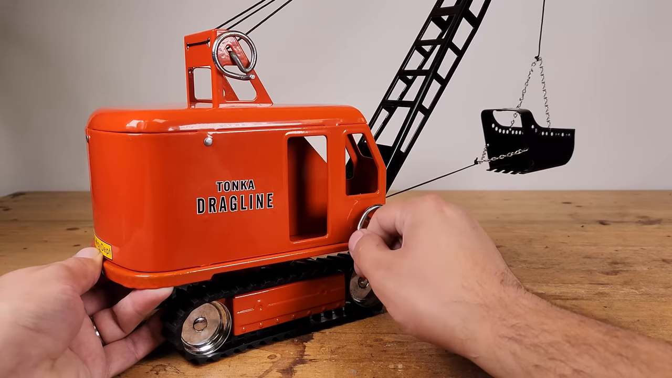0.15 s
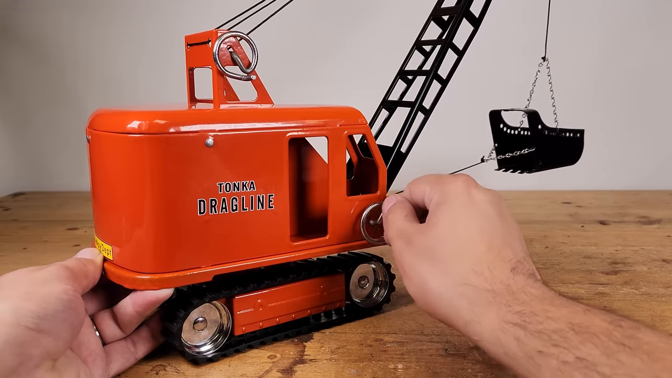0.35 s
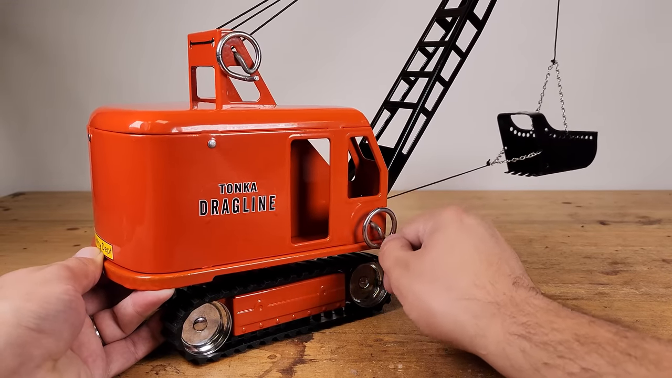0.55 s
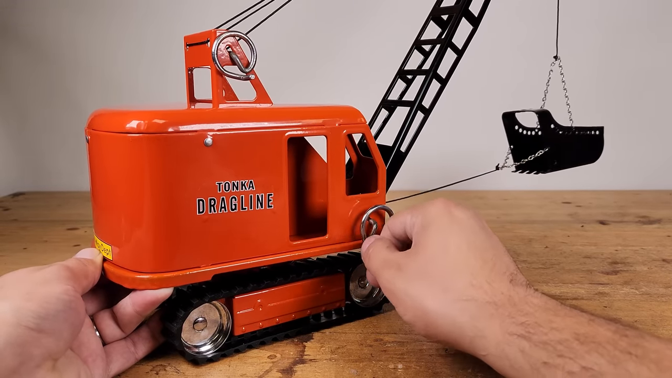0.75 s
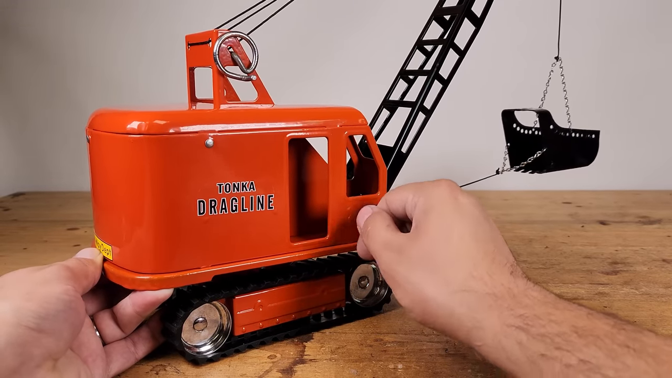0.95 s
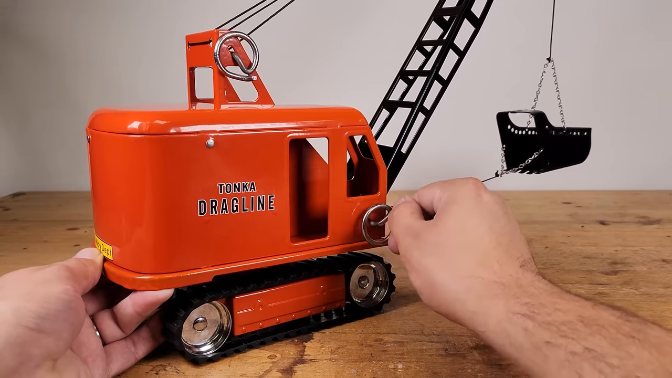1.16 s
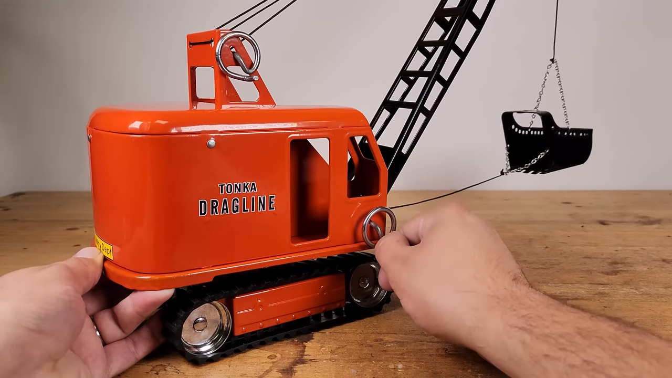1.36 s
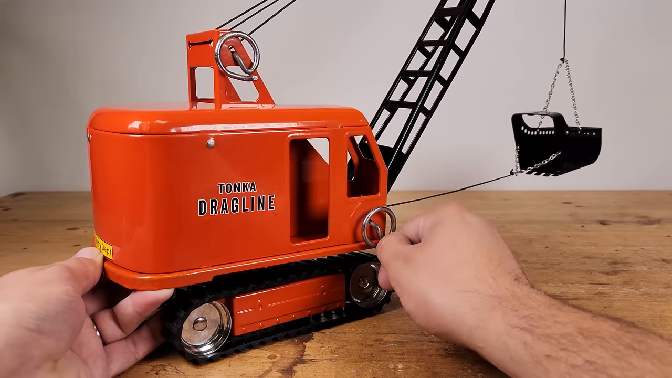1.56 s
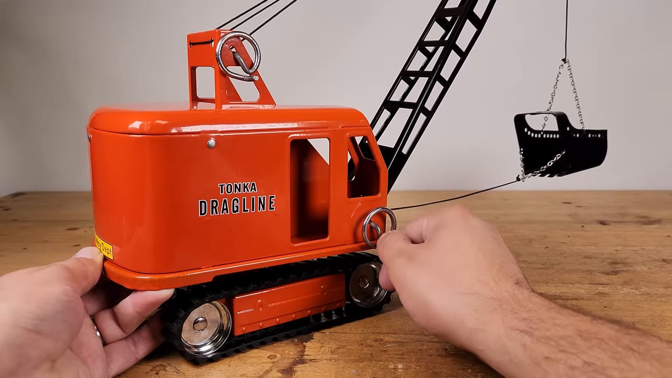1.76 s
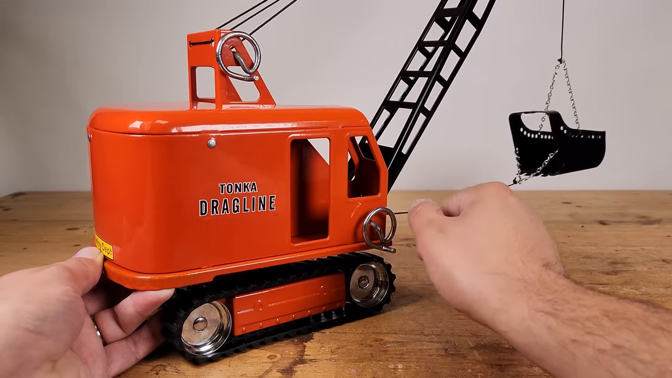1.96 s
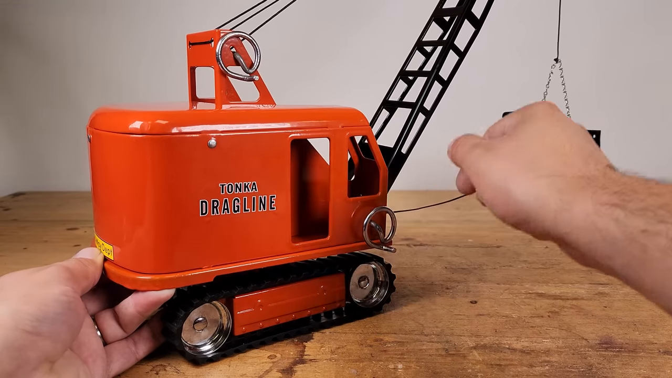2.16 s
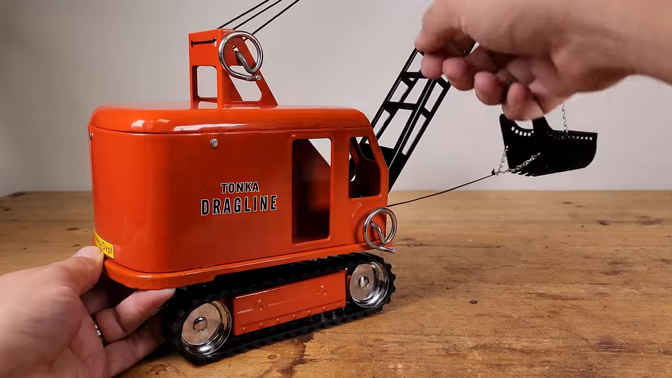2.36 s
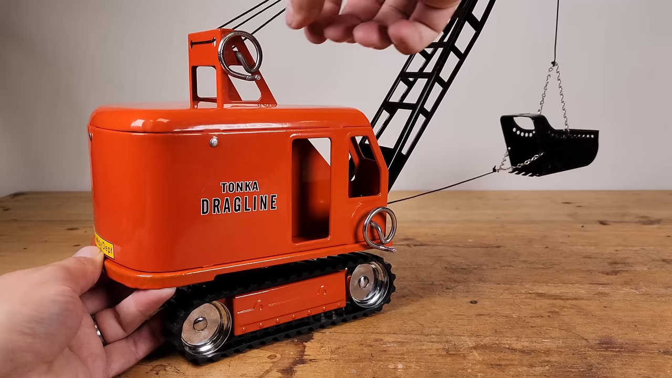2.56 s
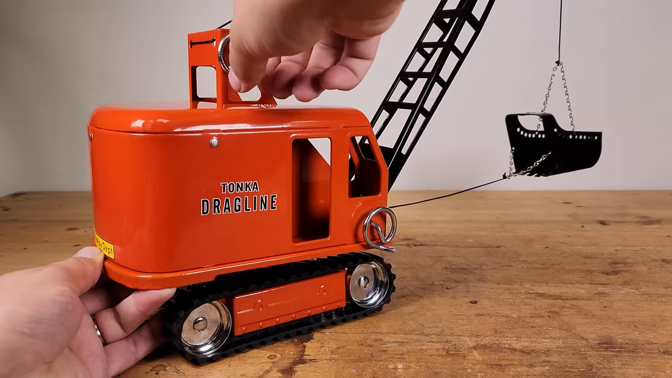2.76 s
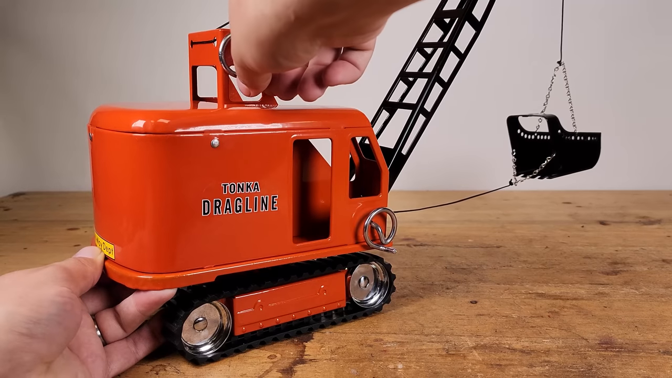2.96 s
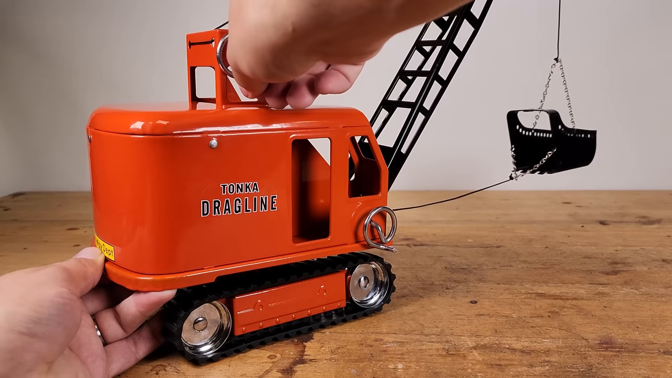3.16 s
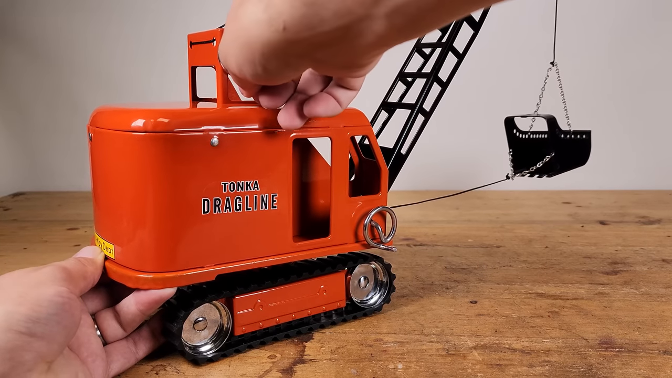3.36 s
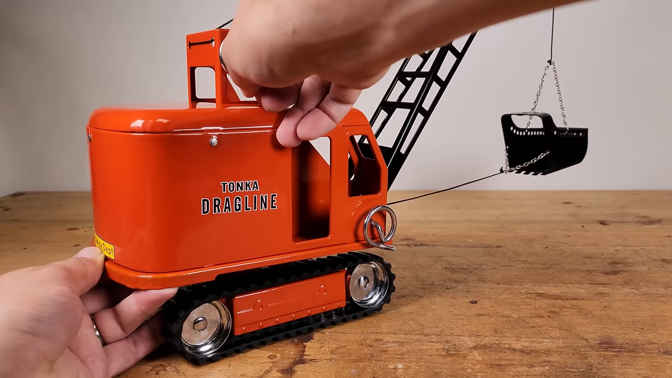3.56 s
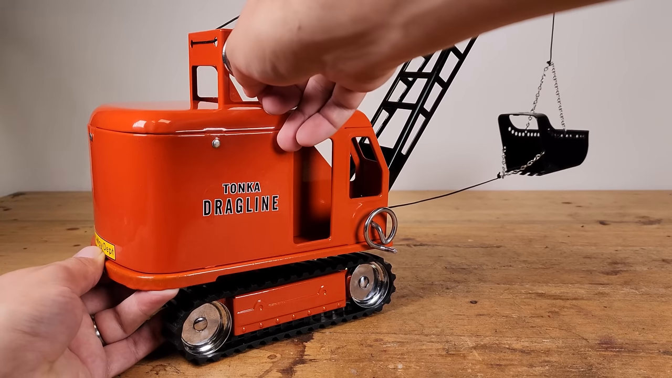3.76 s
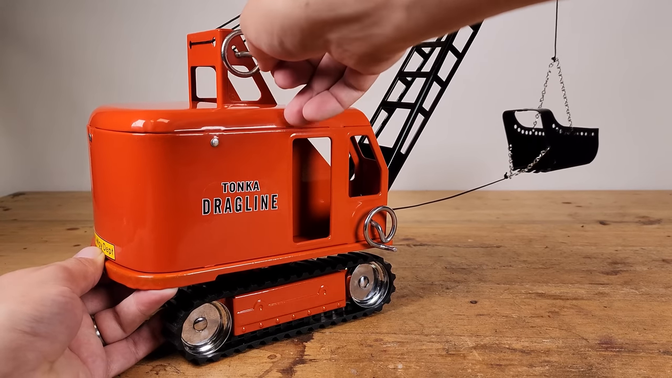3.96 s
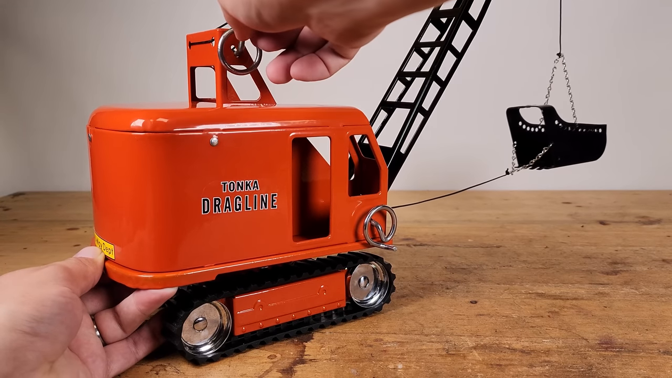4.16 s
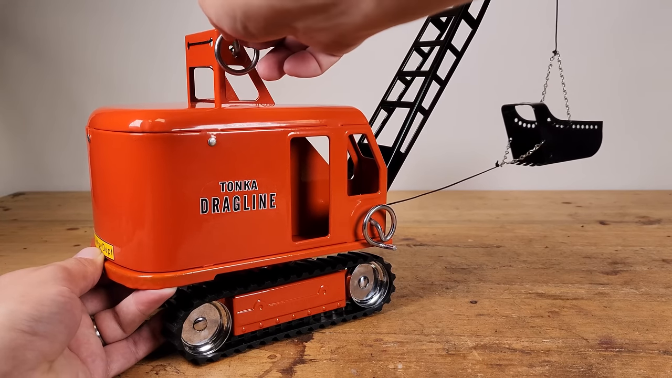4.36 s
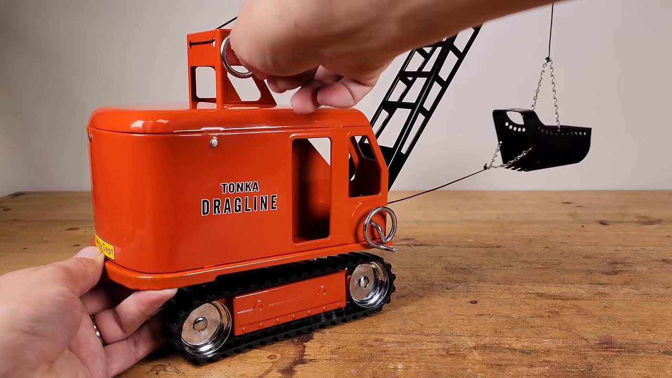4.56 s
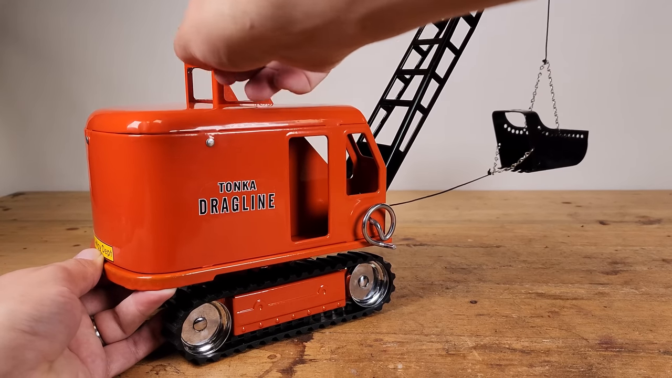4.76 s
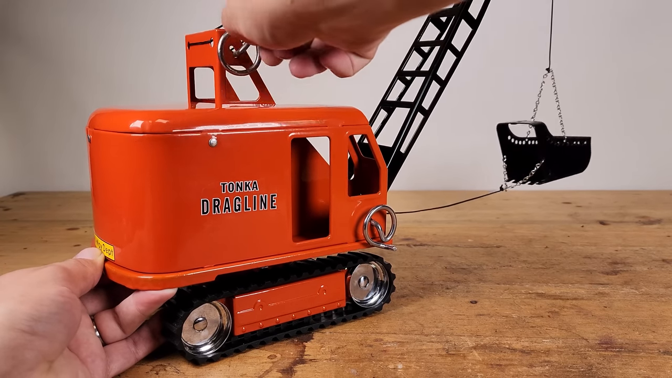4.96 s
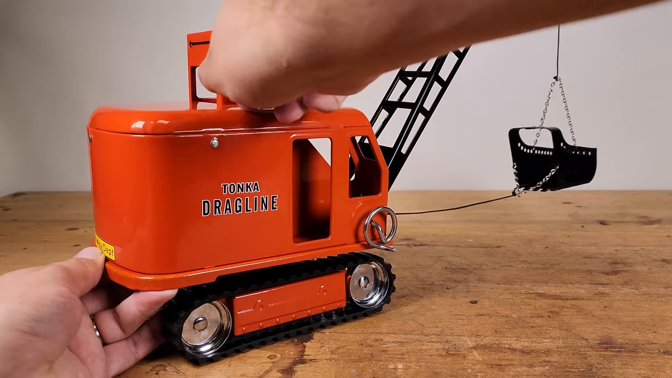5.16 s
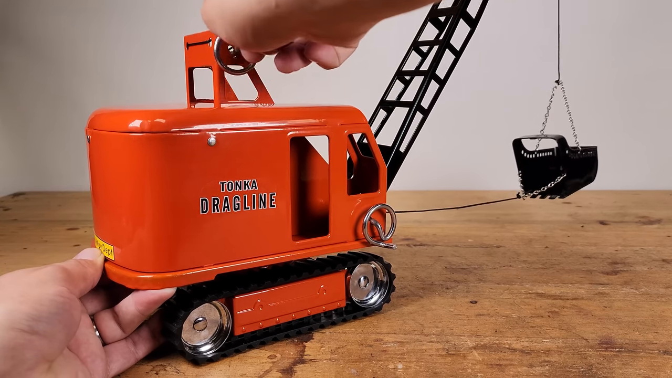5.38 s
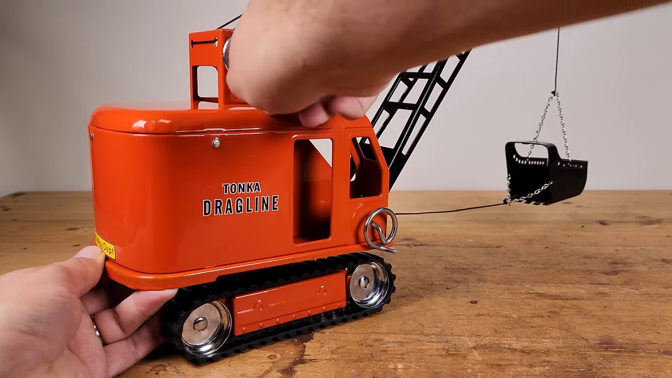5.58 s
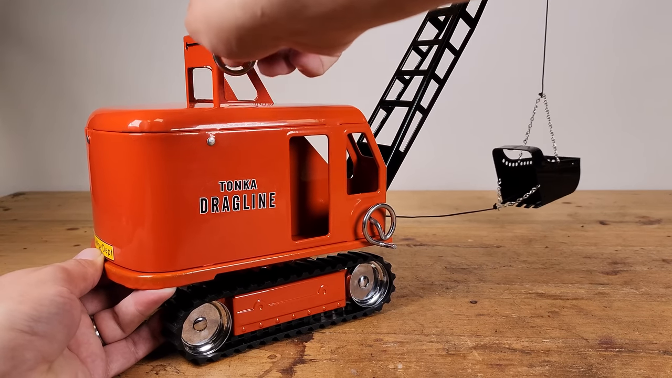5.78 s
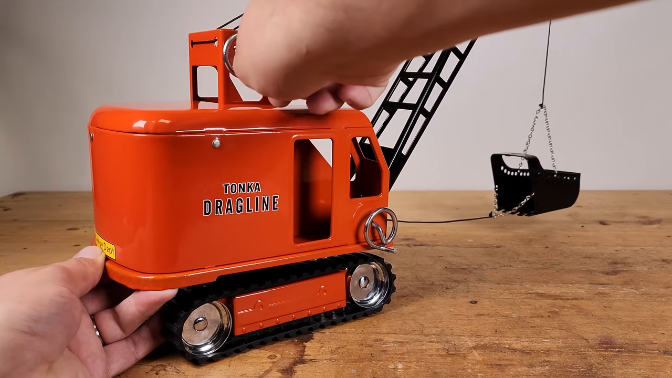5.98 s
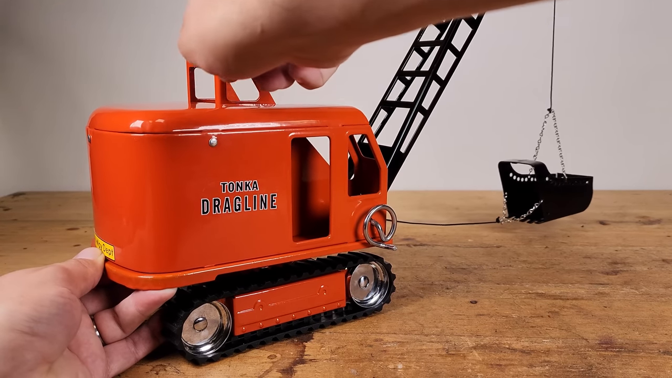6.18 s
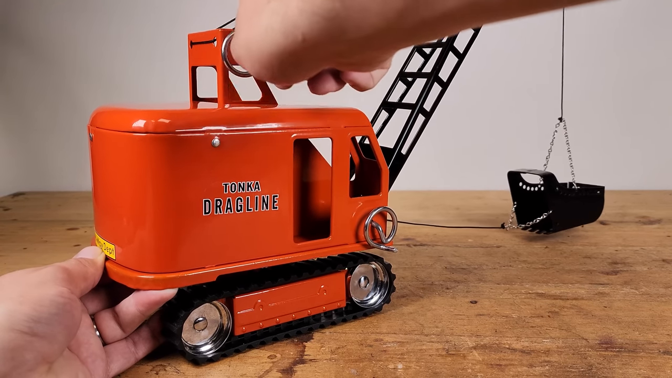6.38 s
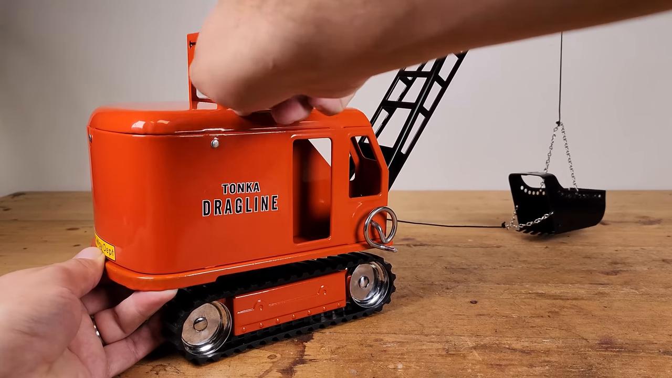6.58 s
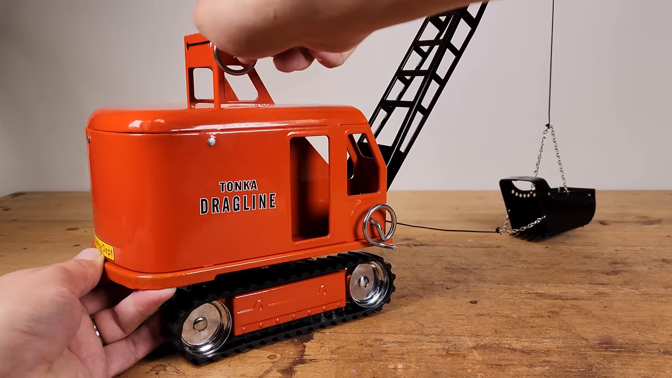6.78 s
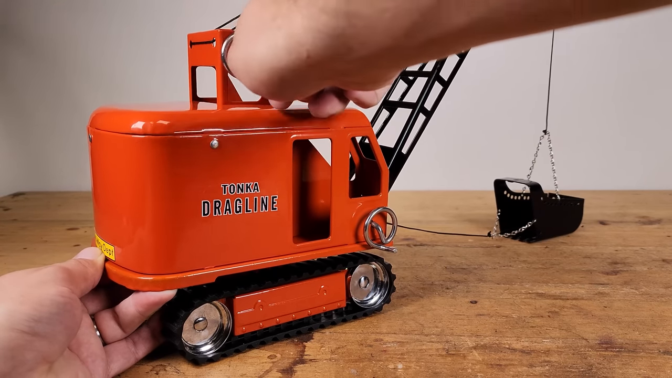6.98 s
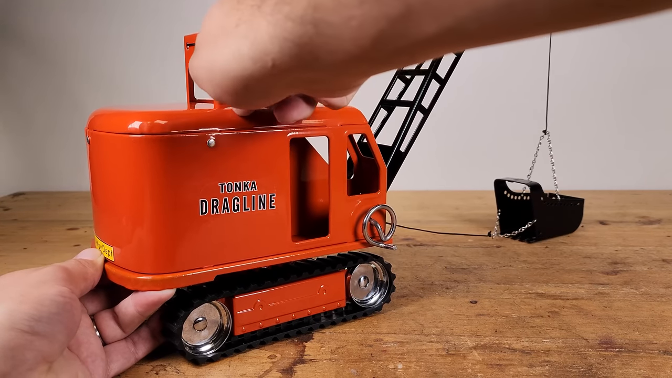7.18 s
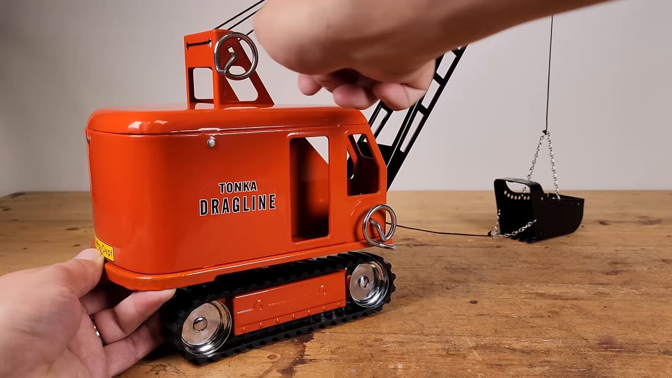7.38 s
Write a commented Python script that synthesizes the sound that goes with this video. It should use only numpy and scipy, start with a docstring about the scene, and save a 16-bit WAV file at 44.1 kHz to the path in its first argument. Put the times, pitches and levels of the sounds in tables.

```python
"""Wooden bench in a quiet room: a hand cranks a sheet-steel toy crane, front winch first, then the top one.
Rubbing shafts and knocks feed grit into resonant modes of the hollow cab; ticks are short noise cracks.
The front shaft squeaks on decaying sines; creaks are gliding tones with noise-like strength.
The bucket clatters onto the bench near the end. Behind: a hand's hiss, a faint rumble at the start,
room echo and a steady stereo hum of shaped noise."""
import sys
import numpy as np
from scipy import signal
from scipy.fft import rfft, irfft, next_fast_len
from scipy.io import wavfile
from scipy.ndimage import uniform_filter1d

SR = 44100
rng = np.random.default_rng(int(sys.argv[2]) if len(sys.argv) > 2 else 0)


def int16_out(signal):
    """Quantize to a 16-bit WAV file."""
    q = np.round(np.clip(np.atleast_2d(signal).T, -1, 1) * 32767)
    wavfile.write(sys.argv[1], SR, q.astype(np.int16))


N = 327663

# Shaft rubbing: t/s, pressure as cab level/dB, rasp level/dB
RUBBING = [(0.0, -65.5, -76), (0.58, -67.5, -77.5), (0.78, -74, -84.5), (1.26, -62.5, -88),
           (1.45, -97, -94.5), (1.88, -97, -94), (2.05, -94, -85), (2.67, -84.5, -88), (3.56, -77.5, -95.5),
           (3.68, -48, -63), (3.81, -85, -89), (3.97, -68, -84.5), (4.14, -66.5, -98), (4.51, -65, -82.5),
           (4.8, -60, -75.5), (5.57, -57.5, -77), (5.77, -56.5, -74), (6.1, -55, -74), (6.7, -60.5, -77.5),
           (7.1, -55, -75.5), (7.33, -82, -85), (7.43, -85, -92)]
# What rubbing stirs, re pressure; rows front, top winch: box/dB, wall/dB, panel/dB, floor plate/dB
RUB_REACH_DB = [(-7, -6, -12, -18), (-0.5, -6, -13.5, -21.5)]
# Knocks of shaft, crank and fingers: t/s, level/dB, wall minus box/dB, panel re knock/dB
KNOCK_EVENTS = [(0.009, -44.5, 4, -9), (0.096, -50, 5, -26), (0.447, -47, -2, -27), (0.456, -38, 0.5, -3.5),
                (0.478, -50, -20, -27), (0.524, -50, -11, -21), (0.646, -50.5, 24, -12),
                (0.793, -51.5, -4, -40), (0.98, -47, -5, -10.5), (1.128, -53, -13, -30),
                (1.175, -47.5, -2, -6), (1.195, -38, -7, -10), (1.219, -52, -13, -15),
                (1.297, -46, -0.5, -9.5), (1.33, -49.5, 1, -7), (1.358, -42.5, 5, -15.5),
                (1.912, -60.5, 13, -1.5), (2.163, -45.5, 9.5, -1.5), (2.619, -67.5, 9, 5),
                (2.824, -60, -18, -2.5), (2.942, -48, -18, -8), (3.049, -52.5, -0.5, -4.5),
                (3.135, -59.5, 9, 5.5), (3.201, -57, -15, -32), (3.265, -44.5, 0, -11),
                (3.332, -39, -8.5, -4), (3.509, -27, -3, -7), (3.521, -38, 0, -17), (3.604, -39, 0.5, 0),
                (3.614, -30, 3.5, -4), (3.647, -29, 0, -21), (3.663, -39, 10, 14.5),
                (3.929, -50, -14, -17.5), (3.966, -54.5, -15.5, -17.5), (3.992, -38.5, -10.5, -8.5),
                (4.014, -52.5, 7, 15.5), (4.12, -39, -1, 2), (4.181, -39.5, 14.5, -1),
                (4.267, -41.5, -2.5, -18), (4.313, -42, -0.5, -17.5), (4.416, -49, -13, -29),
                (4.556, -45.5, -28, -25), (4.606, -40, -8, -1), (4.692, -37, -14, -9.5),
                (4.707, -36.5, -6, -3), (4.747, -24, -10, -5.5), (4.762, -27, -7.5, -7.5),
                (4.785, -43, -9, -18), (4.813, -36, -19, -22), (4.843, -33, -11, -21),
                (4.86, -39, -24, -25), (5.074, -46.5, 1, 4.5), (5.161, -43, -17.5, -4),
                (5.183, -34.5, -5, 5.5), (5.212, -32, -19, -9), (5.236, -36.5, -12, 1),
                (5.26, -36, -21, -25), (5.342, -40, -4.5, -24.5), (5.388, -51, -11, 1.5),
                (5.575, -35.5, -11.5, -4), (5.61, -34, -6, 4), (5.639, -42.5, 1, 1), (5.671, -33.5, -10, 0),
                (5.714, -39.5, -3.5, -28), (5.792, -39, -7.5, -16.5), (5.857, -47, 21, -16),
                (5.957, -38, -23, -36.5), (5.998, -45, 1, -13), (6.036, -32, -7, 1.5),
                (6.085, -41.5, 1, -9), (6.119, -27, -7, -10), (6.132, -45, 17, -29),
                (6.193, -41.5, -4.5, -1), (6.291, -45, 2, -10), (6.377, -53, -6, -31),
                (6.492, -35, -1.5, 6), (6.52, -41, 3, -2), (6.55, -39, 15, -9), (6.657, -43, -3.5, -3),
                (7.043, -28, -0.5, 1), (7.252, -47.5, -3.5, -4), (7.271, -43.5, 2, -19)]
# Jolts of the whole toy, felt in its floor plate: t/s, level/dB
JOLT_EVENTS = [(0.009, -71), (0.456, -55.5), (0.593, -68), (0.793, -67), (1.196, -54.5), (3.049, -65.5),
               (3.509, -51.5), (3.663, -40), (4.607, -54.5), (4.707, -55.5), (4.759, -52), (5.162, -60.5),
               (5.236, -54.5), (5.341, -55.5), (5.715, -64), (5.791, -60.5), (6.035, -60), (6.099, -52.5),
               (6.192, -58.5), (6.51, -57), (6.55, -60), (6.753, -61.5), (7.043, -40.5), (7.251, -58.5)]
# Cab modes, four families: f/Hz, relative level/dB, t60/s
PLATE_MODES = [(328.2, 0, 0.38), (384, 5, 0.15), (459.4, 4.5, 0.13), (520, -3, 0.08)]
BOX_MODES = [(694, -33, 0.071), (661, 6.5, 0.064), (721.6, -1, 0.092), (742.3, 3, 0.04), (793.3, 7.5, 0.19),
             (806, -11, 0.18)]
WALL_MODES = [(983, -7.5, 0.12), (1081.4, 0.5, 0.074), (1131, 3, 0.041), (1175, -13, 0.12),
              (1233.6, -3, 0.097), (1270, -18, 0.17), (1374, -17, 0.24)]
PANEL_MODES = [(1488, -8.5, 0.14), (1617, -3, 0.1), (1771, 9.5, 0.018), (1935, -2.5, 0.057),
               (2115, 13.5, 0.014), (2130, -5.5, 0.0067), (2270, -0.5, 0.012), (2400, -17.5, 0.014),
               (2970, -7, 0.014), (3070, -7, 0.066), (3381, -9.5, 0.045), (3715, -12.5, 0.0066),
               (4100, -14, 0.053)]
# Rasp spectrum, top of the rubbing: f/Hz, relative density/(dB per Hz)
RASP_SPECTRUM = [(1760, -38), (3000, -10.5), (3390, -2), (3670, -5), (7530, -6.5), (9000, -18),
                 (9920, -19.5), (11300, -23.5), (13000, -30)]
# Soft swells of the rasp: t/s, level/dB, 1/e half-length/s
SCUFF_EVENTS = [(0.28, -74, 0.038), (0.96, -71.5, 0.038), (1.11, -75, 0.036), (1.19, -66, 0.016),
                (1.314, -76.5, 0.028)]
# Metal-on-metal ticks: t/s, level/dB, tilt/(dB per octave), decay/s (held to 0.001-0.06)
TICK_EVENTS = [(0.588, -73, -6, 0.0055), (1.915, -66, -6.5, .0095), (2.16, -50, 0.5, 0.007),
               (2.626, -70.5, -2.5, .01), (2.9204, -65, -8, 0.016), (3.1314, -50.5, 0.5, 0.0057),
               (3.505, -52, -5, .011), (3.612, -52, -11.5, 0.067), (3.6594, -19, 3, 0.0046),
               (4.0183, -48.5, -5, 0.006), (4.607, -49.5, 0, .006), (4.694, -57, -4, 0.0087),
               (4.7454, -36, -4, 0.009), (5.075, -52.5, -11, 0.011), (5.1768, -45.5, -16, 0.014),
               (5.2255, -51, -20, 0.014), (5.603, -53, -17.5, 0.012), (5.638, -52.5, -9.5, 0.0088),
               (5.661, -60, -13, .0066), (6.0865, -52.5, -9.5, 0.0076), (6.111, -43.5, -3.5, .011),
               (6.484, -51, -25, 0.0089), (6.527, -54, -6, .009), (6.547, -42.5, -7.5, .0066),
               (7.015, -52, -2, .024), (7.0473, -31.5, -3.5, 0.0073), (7.057, -37, 4.5, 0.0107),
               (7.082, -51, 10, 0.0071), (7.265, -62, -16.5, 0.011)]
# Tick spectrum, modes too dense to tell apart: f/Hz, relative density/(dB per Hz)
TICK_SPECTRUM = [(1800, -24.5), (3000, -6), (4000, -5.5), (5800, 2), (8000, -3.5), (10500, -8.5),
                 (13800, -17), (15300, -9), (16000, -11.5), (16800, -44)]
# Front-shaft squeaks: t/s, level/dB, slip length/s
SQUEAK_EVENTS = [(0.576, -42, 0.025)]
# Squeak tones: f/Hz, level re squeak/dB, t60/s
SQUEAK_TONES = [(5305, 5, 0.086), (5360, 2.5, 0.061), (5530, -13.5, 0.31), (5620, -16, 0.036),
                (10700, -32, 0.058)]
# Narrow, rough creaks: t/s, f/Hz, level/dB, 1/e half-length/s
CREAK_EVENTS = [(0.265, 4120, -72, 0.023), (0.323, 2330, -69, 0.037), (.52, 2400, -70.5, 0.024),
                (0.969, 7790, -65.5, 0.02), (0.97, 4210, -65, 0.021), (1.095, 3330, -75, 0.06),
                (1.24, 2130, -73, 0.036), (1.302, 4460, -72.5, 0.025), (1.348, 5320, -63.5, 0.021),
                (2.93, 5200, -73, 0.019), (4.965, 2310, -69.5, 0.04), (5.913, 2300, -61, 0.045),
                (5.991, 2160, -72, 0.025), (6.36, 2304, -56, 0.015), (6.414, 2270, -63.5, 0.043),
                (6.899, 2220, -71, 0.098)]
# Bucket meets bench: t/s, belly level/dB, sides level/dB, bench level/dB, rattle length/s
LANDING_EVENTS = [(6.991, -41.5, -54, -59.5, 0.015), (7.014, -40.5, -36.5, -42, 0.038),
                  (7.047, -32, -24, -36.5, 0.0036), (7.065, -30, -30, -50, 0.0029),
                  (7.089, -30.5, -39.5, -61, 0.0026), (7.135, -47, -55, -60, 0.01)]
# Bucket belly, bucket sides and bench modes: f/Hz, relative level/dB, t60/s
BELLY_MODES = [(285, -5, .07), (320, 0, .1), (400, -7, .06)]
SIDE_MODES = [(511, -5, 0.11), (607.6, -1.5, 0.12), (821, -5, 0.062), (1083, -6, 0.1), (1304, -4.5, 0.066),
              (1500, -18, 0.038), (1620, -9, 0.013), (2290, -13, 0.029), (2812, 1.5, 0.043),
              (3080, -19.5, 0.016)]
BENCH_MODES = [(109, 9, .13), (180, -5, .1), (240.7, -6, .12)]
# Hand slides off the bench: t/s, level/dB
SWISH_CURVE = [(1.95, -83), (1.964, -74), (1.998, -58), (2.074, -61.5), (2.13, -80)]
# Swish spectrum: f/Hz, relative density/(dB per Hz)
SWISH_SPECTRUM = [(88, -41), (150, -3), (323, -10.5), (417, 5.5), (1050, -6), (1970, 1), (2550, -11.5),
                  (4330, -11.5), (15300, -30.5), (16500, -46)]
# Room-air hum spectrum: f/Hz, relative density/(dB per Hz)
HUM_SPECTRUM = [(12, -26), (20, -7.5), (55, -3), (67, -8.5), (92, -17.5), (128, -17.5), (209, -26.5),
                (244, -18.5), (300, -26.5), (419, -23), (490, -27.5), (2420, -35.5), (2900, -40.5),
                (8140, -46), (9500, -70.5), (12400, -72.5), (20900, -120)]
# Left-right likeness of the hum: f/Hz, likeness/1
HUM_LIKENESS = [(60, 0.98), (110, .93), (180, 0.6), (550, 0), (15000, 0)]
# Direct sound at two spaced capsules, at side = 1: f/Hz, left phase lead/rad
CAPSULE_LEAD = [(0, 0.5), (1890, 1.85), (3700, 11.5), (5860, 11.5), (6550, 7), (7150, 19), (9650, 18.5),
                (10400, 23), (12400, 21), (13100, 17), (15800, 25), (16700, 29)]
# Same, level step at side = 1: f/Hz, left minus right/dB
CAPSULE_LEAN = [(60, 2.5), (150, -10.5), (380, 6), (950, 0), (2380, 8), (5980, -1), (15000, 5)]
# Room decay: f/Hz, t60/s
ROOM_T60 = [(200, 0.26), (1000, 0.24), (4000, 0.24), (14000, 0.16)]

TOP_WINCH_S = 2.5   # hand moves from front winch to top one
RATTLE_S, RATTLE_LOG_SPREAD = 0.01, 0.36   # knock's rattle
PLATE_DB = -34.5   # floor plate re knock
JOGS_PER_S = 4   # small chance knocks
JOG_DB, JOG_SPREAD_DB, JOG_PANEL_DB = 5.5, 3.5, -6   # re pressure; tail; panel re jog
WHIR_HZ, WHIR_DB, WHIR_T60_S = 1114, -5, .07   # dB re pressure
TICK_RISE_S, SHIMMER_DB, SHIMMER_T60_S = 0.0054, -33.0, 0.13
CREAK_WIDTH, CREAK_SAG_PER_S = 0.038, 0.36   # shares of pitch
RUMBLE_DB, RUMBLE_ENDS_S, RUMBLE_FADE_S = -79, 0.38, 0.046
CAB_SIDE, BUCKET_SIDE = 0.92, -0.6   # share of capsule lead and lean; bucket hangs across from cab
ROOM_DB, HUM_DB, CUTOFF_HZ = -5, -69.5, 17100


def cab():
    """Hollow cab: knocks and rubbing feed four mode families; rubbing also whirs and rasps."""
    pressure_db, rasp_db = in_time(RUBBING)
    front = np.arange(N) / SR < TOP_WINCH_S
    events = np.vstack([KNOCK_EVENTS, jogs(pressure_db, front)])
    at_s, level_db, lean_db, hard_db = events.T
    length_s = RATTLE_S * np.exp(RATTLE_LOG_SPREAD * rng.standard_normal(len(at_s)))
    contact = rms_one(grit(N, 3.2)) * from_db(1.72 * drift(40))
    reach_db = np.where(front, *np.array(RUB_REACH_DB)[:, :, None])
    rub_box, rub_wall, rub_panel, rub_plate = contact * from_db(pressure_db + reach_db)

    # positive lean weakens the box, negative the wall
    box_db = level_db - np.maximum(lean_db, 0)
    wall_db = level_db + np.minimum(lean_db, 0)
    plate = struck(PLATE_MODES, at_s, level_db + PLATE_DB, length_s, 3.5, rub_plate) + jolted_plate()
    box = struck(BOX_MODES, at_s, box_db, length_s, 1.5, rub_box)
    wall = struck(WALL_MODES, at_s, wall_db, length_s, 3.0, rub_wall)
    panel = struck(PANEL_MODES, at_s, level_db + hard_db, length_s, 4.35, rub_panel)
    sheet = within(plate, 330, 1100) + within(box, 666.4, 783.5)
    sheet += within(wall, 910, 1500) + within(panel, 1600, 5000)
    return sheet + front * whir(contact, pressure_db) + rasp(contact, from_db(rasp_db))


def jogs(pressure_db, front):
    """Chance knocks follow the pressure and lean to the winch in use; rows as KNOCK_EVENTS."""
    draw = rng.random((JOGS_PER_S * N // SR, 3))
    at = (draw[:, 0] * N).astype(int)
    front_reach, top_reach = RUB_REACH_DB
    lean_db = np.where(front[at], front_reach[1] - front_reach[0], top_reach[1] - top_reach[0])
    lean_db = lean_db + 16 * (draw[:, 2] - .5)
    level_db = pressure_db[at] + JOG_DB - JOG_SPREAD_DB * np.log(1 - .95 * draw[:, 1])
    return np.transpose([at / SR, level_db, lean_db, np.full(len(at), JOG_PANEL_DB)])


def jolted_plate():
    """Jolts of the whole toy ring the floor-plate modes."""
    at_s, level_db = np.transpose(JOLT_EVENTS)
    return struck(PLATE_MODES, at_s, level_db, np.full(len(at_s), RATTLE_S), 1.4)


def whir(contact, pressure_db):
    """Shaft contact excites one resonance, at a level set by the pressure."""
    return from_db(pressure_db + WHIR_DB) * rms_one(ring(contact, WHIR_HZ, WHIR_T60_S))


def rasp(contact, level):
    """Rubbing catches now one, now another of many short high modes."""
    t = np.arange(N) / SR
    for at_s, top_db, span_s in SCUFF_EVENTS:
        level = level + from_db(top_db) * np.exp(-((t - at_s) / span_s) ** 2)
    caught = np.zeros(N)
    for k, hz in enumerate(np.geomspace(2600, 13000, 30)):
        mode = rms_one(ring(np.roll(contact, 997 * k), hz, 220.0 / hz))   # shifted: modes differ
        caught += from_db(5.0 * drift(11)) * mode * np.sqrt(hz)
    return level * rms_one(coloured(caught, RASP_SPECTRUM))


def ticks():
    """Fast-dying noise crack over a weaker, slower shimmer; each has its own lumpy colour."""
    at_s, level_db, tilt, decay_s = np.transpose(TICK_EVENTS)
    size = 16384
    t, decay_s = np.arange(size) / SR, np.clip(decay_s, .001, .06)[:, None]
    shimmer = from_db(SHIMMER_DB - 60 * t / SHIMMER_T60_S)
    shape = np.minimum(t / TICK_RISE_S, 1) * (np.exp(-t / decay_s) + shimmer)
    hz = np.fft.rfftfreq(size, 1 / SR)
    lumps = rms_one(uniform_filter1d(rng.standard_normal((len(at_s), len(hz))), size=80))
    colour_db = tilt[:, None] * np.log2(np.clip(hz, 2000, 16000) / 7000) + 1.8 * lumps
    noise = coloured(rng.standard_normal((len(at_s), size)), TICK_SPECTRUM, colour_db)
    cracks = noise * shape * from_db(level_db)[:, None]
    at = np.round(at_s * SR).astype(int)[:, None] + np.arange(size)
    return np.bincount(at.ravel(), cracks.ravel(), N + size)[:N]


def squeaks():
    """Tones swell while the shaft slips, then each dies at its own rate."""
    out, t = np.zeros(N), np.arange(N) / SR
    for at_s, top_db, slip_s in SQUEAK_EVENTS:
        for hz, level_db, t60_s in SQUEAK_TONES:
            decay = from_db(-60 * np.maximum(t - at_s - slip_s, 0) / t60_s)
            swell = np.clip((t - at_s) / slip_s, 0, 1) ** 2 * decay
            gain = from_db(top_db + level_db + 2 * drift(59))
            out += swell * gain * np.sin(2 * np.pi * (hz * t + rng.random()))
    return out


def creaks():
    """Stick-slip at one joint: gliding tone, strength and sign wandering as fast as its width."""
    out, t = np.zeros(N), np.arange(N) / SR
    for at_s, hz, top_db, span_s in CREAK_EVENTS:
        since = t - at_s
        phase = 2 * np.pi * hz * (1 - CREAK_SAG_PER_S * since / 2) * since
        rate_hz = CREAK_WIDTH * hz / 2
        tone = drift(rate_hz) * np.sin(phase) + drift(rate_hz) * np.cos(phase)
        out += from_db(top_db) * np.exp(-(since / span_s) ** 2) * tone
    return out


def bucket():
    """Bucket clatters down: belly booms, sides ring, bench thumps, each from its own modes."""
    at_s, belly_db, sides_db, bench_db, length_s = np.transpose(LANDING_EVENTS)
    belly = within(struck(BELLY_MODES, at_s, belly_db, length_s, 1.8), 214, 950)
    sides = within(struck(SIDE_MODES, at_s, sides_db, length_s, 2.8), 400, 5400)
    bench = within(struck(BENCH_MODES, at_s, bench_db, length_s, 0.85), 79, 410)
    return belly + sides + bench


def swish():
    """Skin slides over wood: brief broad hiss."""
    t = np.arange(N) / SR
    inside = (t > SWISH_CURVE[0][0]) & (t < SWISH_CURVE[-1][0])
    level = from_db(in_time(SWISH_CURVE)[0] + 2.0 * drift(55))
    return level * inside * banded_noise(SWISH_SPECTRUM, [(200, 0.9), (8000, 0.11)])


def rumble():
    """Lumpy low noise that soon fades."""
    fade = np.clip((RUMBLE_ENDS_S - np.arange(N) / SR) / RUMBLE_FADE_S, 0, 1)
    low = rms_one(within(rng.standard_normal(N), 120, 300))
    return fade * from_db(RUMBLE_DB + 3.2 * drift(14)) * low


def room(x):
    """Echo: noise tail dying band by band, partly shared by both sides."""
    t, tail = np.arange(SR // 2) / SR, 0
    for low_hz in 100 * 2. ** np.arange(0, 7.5, .5):
        edges_hz = [low_hz, min(low_hz * 2 ** .5, .45 * SR)]
        band = signal.butter(2, edges_hz, "band", fs=SR, output="sos")
        mid, side = signal.sosfilt(band, rng.standard_normal((2, len(t))))
        wide = np.clip(low_hz / 1500, 0, 1)   # close capsules agree on long waves
        decay = from_db(-60 * t / max(at_hz(ROOM_T60, low_hz), .05))
        tail = tail + (mid + wide * side * [[1], [-1]]) * decay
    tail = tail * (t > .004) / np.sqrt(np.sum(tail ** 2) / 2)
    return signal.fftconvolve(x[None], tail, axes=1)[:, :N]


def hum():
    """Quiet room: steady stereo noise, alike left and right in the lows."""
    return from_db(HUM_DB) * banded_noise(HUM_SPECTRUM, HUM_LIKENESS)


def capsules(x, side):
    """Two spaced capsules hear direct sound with a pitch-dependent phase and level step."""
    size = next_fast_len(N + 4096)
    hz = np.maximum(np.fft.rfftfreq(size, 1 / SR), 1)
    lead_rad = np.interp(hz, *np.transpose(CAPSULE_LEAD))
    half = from_db(side * at_hz(CAPSULE_LEAN, hz) / 2) * np.exp(.5j * side * lead_rad)
    return irfft(rfft(x, size) * np.array([half, 1 / half]), size)[:, :N]


def struck(modes, at_s, level_db, length_s, spread_db, rub=None):
    """Each blow, a short contact rattle, finds every mode with its own strength; rubbing feeds steadily."""
    size = 4096
    t, length_s = np.arange(size) / SR, np.clip(length_s, .001, .06)[:, None]
    rattle = grit((len(at_s), size), 4.72) * (t / length_s) ** 0.17 * np.exp(-t / length_s)
    rattle = rattle / np.sqrt(np.sum(rattle ** 2, axis=1, keepdims=True))
    at = (np.round(at_s * SR).astype(int)[:, None] + np.arange(size)).ravel()
    strength = from_db(level_db[:, None] + rng.normal(0, spread_db, (len(at_s), len(modes))))
    share = from_db(np.array(modes)[:, 1])
    share = share / np.sqrt(np.sum(share ** 2))
    out = np.zeros(N)
    for k, (hz, _, t60_s) in enumerate(modes):
        at_pitch = np.abs(rattle @ np.exp(2j * np.pi * hz * t))   # rattle's content at this mode
        blows = (strength[:, k] / (at_pitch + .3))[:, None] * rattle
        force = np.bincount(at, blows.ravel(), N + size)[:N]
        if rub is not None:   # scaled so steady rubbing rings at its own rms, wandering per mode
            force = force + rub * from_db(3.5 * drift(12)) * np.sqrt(4 * np.log(1000) / (t60_s * SR))
        out += share[k] * ring(force, hz, t60_s)
    return out


def ring(force, hz, t60_s):
    """Two-pole resonator: a unit click starts a decaying sine of height 1."""
    r = from_db(-60 / (max(t60_s, .005) * SR))
    w = 2 * np.pi * hz / SR
    return signal.lfilter([0, np.sin(w)], [1, -2 * r * np.cos(w), r * r], force + 1e-18)


def grit(shape, spread_db):
    """Uneven tiny contacts: random signs, long-tailed sizes."""
    size_db = spread_db * np.minimum(rng.exponential(1, shape), 5)
    return from_db(size_db) * rng.choice([-1, 1], shape)


def drift(rate_hz):
    """Slow chance of spread 1: low-passed noise, made at SR / 40."""
    r = np.exp(-80 * np.pi * rate_hz / SR)
    noise = rng.standard_normal(N // 40 + 2002)
    slow = signal.lfilter([1], [1, -2 * r, r * r], noise)[2000:]   # drop run-in
    return np.interp(np.arange(N) / 40, np.arange(len(slow)), rms_one(slow))


def banded_noise(spectrum, alike):
    """Stereo noise, rms 1, with level and likeness set by pitch."""
    hz = np.maximum(np.fft.rfftfreq(N, 1 / SR), 1)
    mid, side = rfft(rng.standard_normal((2, N))) * from_db(at_hz(spectrum, hz))
    c = np.clip(at_hz(alike, hz), 0, 1)
    return rms_one(irfft(np.sqrt(1 + c) * mid + np.sqrt(1 - c) * side * [[1], [-1]], N))


def coloured(x, spectrum, more_db=0):
    """Give white rows a spectrum, keeping their energy."""
    hz = np.maximum(np.fft.rfftfreq(x.shape[-1], 1 / SR), 1)
    gain = from_db(at_hz(spectrum, hz) + more_db)
    gain = gain / np.sqrt(np.mean(gain ** 2, axis=-1, keepdims=True))
    return irfft(rfft(x) * gain, x.shape[-1])


def within(x, low_hz, high_hz):
    """Band-pass: a body radiates little outside its own range."""
    return signal.sosfilt(signal.butter(2, [low_hz, high_hz], "band", fs=SR, output="sos"), x)


def from_db(db):
    """Decibels to gain."""
    return 10 ** (np.asarray(db) / 20)


def rms_one(x):
    """Scale to rms 1."""
    return x / np.sqrt(np.mean(x ** 2) + 1e-20)


def in_time(rows):
    """Columns of a curve table at every sample."""
    at_s, *columns = np.transpose(rows)
    return [np.interp(np.arange(N) / SR, at_s, c) for c in columns]


def at_hz(points, hz):
    """Read a curve on a log-frequency axis."""
    points_hz, values = np.transpose(points)
    return np.interp(np.log(hz), np.log(points_hz), values)


def scene():
    """Crane and bucket, direct and echoed, then hand and hum."""
    crane = cab() + ticks() + squeaks() + creaks() + rumble()
    load = bucket()
    direct = capsules(crane, CAB_SIDE) + capsules(load, BUCKET_SIDE)
    echo = from_db(ROOM_DB) * room(crane + load)
    return direct + echo + swish() + hum()


def record(dry):
    """Steep low-pass, 70 dB down from CUTOFF_HZ up."""
    return signal.sosfilt(signal.cheby2(12, 70, CUTOFF_HZ, fs=SR, output="sos"), dry)


dry = scene()
out = record(dry)
int16_out(out)
```